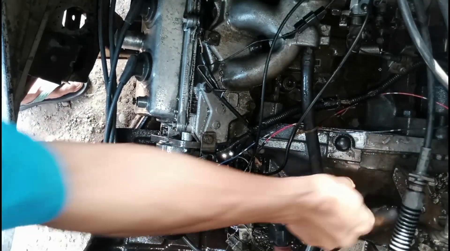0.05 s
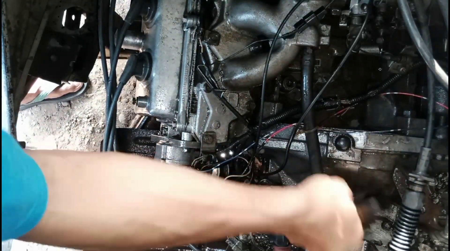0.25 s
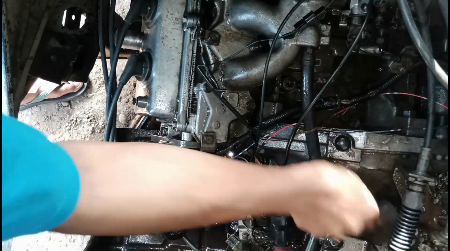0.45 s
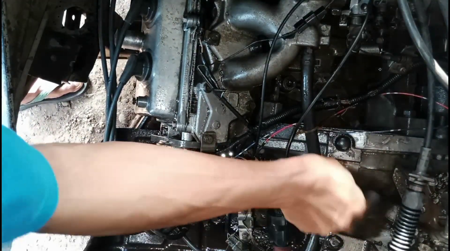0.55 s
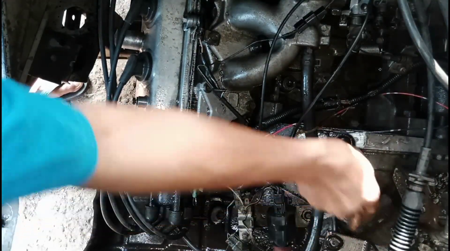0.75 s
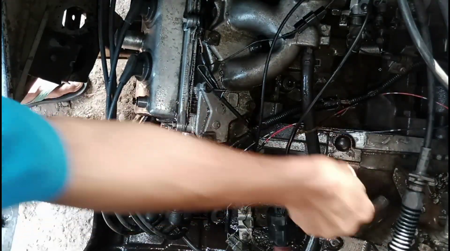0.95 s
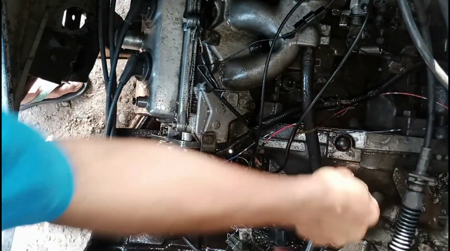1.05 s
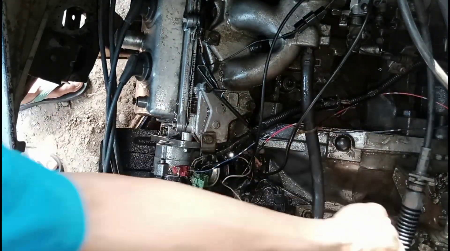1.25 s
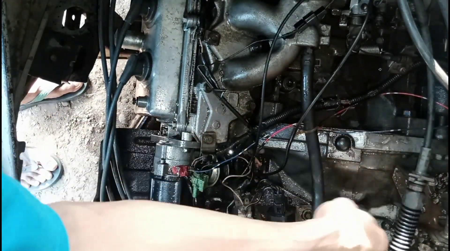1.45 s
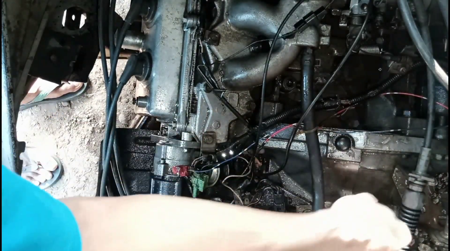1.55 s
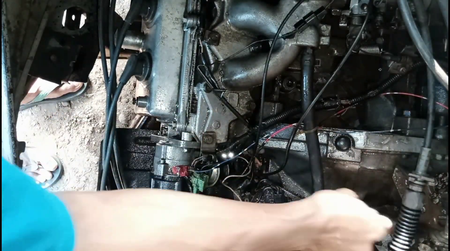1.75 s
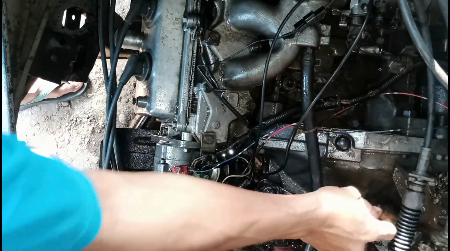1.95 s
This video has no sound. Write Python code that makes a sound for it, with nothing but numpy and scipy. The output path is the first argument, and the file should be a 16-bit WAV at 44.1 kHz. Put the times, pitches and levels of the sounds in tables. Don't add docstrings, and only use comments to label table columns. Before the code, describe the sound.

A paintbrush scrubs engine parts close to a phone microphone outdoors: short dry bristle hisses, wooden handle scraping and knocking on metal, loudest near the middle, over a faint wavering low machine hum.

```python
import sys
import numpy as np
from scipy import signal
from scipy.io import wavfile
from scipy.ndimage import uniform_filter1d

SR = 44100
rng = np.random.default_rng(int(sys.argv[2]) if len(sys.argv) > 2 else 0)


def volts_from_db(level):
    exponent = np.asarray(level, float) / 20
    return 10 ** exponent


def unload_audio(sound):
    columns = np.transpose(np.atleast_2d(sound))
    steps = np.round(np.clip(columns, -1, 1) * 32767)
    wavfile.write(sys.argv[1], SR, steps.astype(np.int16))


N = 88200


def evened(x):
    return x / np.sqrt(np.mean(x ** 2) + 1e-20)


def read(points, hz):
    f, value = np.transpose(points)
    return np.interp(np.log(hz + 1), np.log(f + 1), value)


def colour(x, gain_db):
    hz = abs(np.fft.fftfreq(4096, 1 / SR))
    log_gain = np.log(volts_from_db(gain_db(hz)))
    taps = np.fft.ifft(np.exp(signal.hilbert(log_gain).conj())).real[:2048]
    return signal.fftconvolve(x, taps)[:len(x)]


def resonate(x, hz, width_hz):
    r = np.exp(-np.pi * width_hz / SR)
    w = 2 * np.pi * hz / SR
    return signal.lfilter([0, np.sin(w)], [1, -2 * r * np.cos(w), r * r], x)


def ring_modes(drive, hz, db, t60):
    return sum(volts_from_db(g) * resonate(drive, f, 2.2 / d) for f, g, d in zip(hz, db, t60))


def add(mix, s, sound):
    at = round(s * SR)
    part = mix[max(at, 0):][:len(sound) + min(at, 0)]
    part += sound[max(-at, 0):][:len(part)]


def smooth_twice(x, size):
    return uniform_filter1d(uniform_filter1d(x, size=size), size=size)


def swell(rise, fall):
    edge_db = 25
    t = np.arange(-2 * rise, 2 * fall, 1 / SR)
    return volts_from_db(-edge_db * np.where(t < 0, (t / rise) ** 2, abs(t / fall) ** 1.104))


def clicks(count, per_s, spread_db):
    happens, sign, size = rng.random((count, 3)).T
    heights = np.sign(sign - 0.5) * volts_from_db(-spread_db * np.log(size + 0.00318))
    return evened((happens < per_s / SR) * heights)


def patchy(x, frames=18, bins=3):
    z = signal.stft(x, nperseg=256)[2]
    patches = uniform_filter1d(rng.standard_normal(z.shape), size=bins, axis=0)
    patches = evened(uniform_filter1d(patches, size=frames, axis=1))
    patch_db = 2.5
    return signal.istft(z * volts_from_db(patch_db * patches), nperseg=256)[1][:N]


# (frequency [Hz], level [dB], fade by 60 dB [s])
FERRULE_MODES = [(3300, -6, .015), (4200, -6, .015), (5900, -3, .015), (6250, 0, .025), (6700, -3, .015),
                 (8900, -4, .015)]


def ferrule(drive):
    return evened(ring_modes(drive, *np.transpose(FERRULE_MODES)))


# (fullest moment [s], rise [s], fall [s], level [dB], brightness [dB per octave]); the first four,
# faint and short, are the background hiss fluttering before the brush work
SWEEPS = [(.005, 0.045, 0.05, -48.5, 0), (0.065, 0.043, 0.039, -51.5, 2.5), (0.119, 0.032, 0.045, -41, 11),
          (0.181, 0.0097, 0.05, -49.5, 2), (0.225, .03, 0.11, -38, 1.5), (0.352, 0.041, 0.099, -37, 2.5),
          (0.402, 0.09, 0.084, -34.5, 5), (0.543, 0.029, 0.11, -40, 3.5), (1.971, 0.024, 0.039, -36, 6),
          (0.677, 0.12, 0.064, -36, 5), (1.085, 0.011, 0.061, -41, 13), (0.777, 0.1, 0.26, -38, 4),
          (0.982, 0.058, 0.092, -35, 3.5), (1.119, .04, 0.042, -36, 0), (1.229, 0.077, 0.11, -32.5, 7.5),
          (1.292, 0.036, 0.051, -41, 2.5), (1.37, 0.047, 0.062, -44.5, 3), (1.422, 0.025, 0.28, -52, -5.5),
          (1.494, 0.062, 0.03, -29.5, 6), (1.542, 0.054, 0.045, -28.5, 5), (1.64, 0.058, 0.073, -45, 4),
          (1.741, 0.048, 0.065, -34, 4.5), (1.849, 0.062, 0.075, -44, 0.5), (1.932, 0.03, 0.047, -43, -1)]
# (frequency [Hz], level [dB])
BRISTLE_COLOUR = [(400, -12), (1700, -13.5), (2300, -6.5), (4000, -3.5), (5200, -6), (6300, -1.5),
                  (7500, -8), (9000, -7)]


def bristles():
    out = np.zeros(N)
    flicks = clicks(N + SR, per_s=7200, spread_db=2)
    ferrule_db = -27
    for s, rise, fall, db, tilt_db in SWEEPS:
        shape = swell(rise, fall)
        under_sweep = flicks[round(s * SR):][:len(shape)]
        hiss = colour(under_sweep, lambda hz: read(BRISTLE_COLOUR, hz) + tilt_db * np.log2((hz + 300) / 6000))
        brush = evened(evened(hiss) + volts_from_db(ferrule_db) * ferrule(hiss))
        add(out, s - 2 * rise, volts_from_db(db) * shape * brush)
    return patchy(out)


# (time [s], length [s], level [dB])
HUM_SWELLS = [(0.072, 0.3, -55), (0.176, 0.042, -48), (0.337, 0.042, -54), (0.494, 0.072, -38.5),
              (0.602, 0.071, -40.5), (0.732, 0.16, -43.5), (0.902, .1, -57), (1.086, 0.047, -41),
              (1.188, 0.045, -45.5), (1.382, 0.23, -75.5), (1.488, 0.15, -44.5), (1.57, 0.072, -40),
              (1.643, 0.031, -38.5), (1.702, 0.078, -44.5), (1.829, 0.051, -44), (1.935, 0.05, -38)]
# (frequency [Hz], level [dB])
AIR_COLOUR = [(20, -24), (60, 13), (150, -16), (220, 6), (700, -0.5), (1100, -9.5), (2500, -12),
              (6000, -20.5)]


def hum():
    fuzz, upper, air, wander = rng.standard_normal((N, 4)).T
    t = np.arange(N) / SR
    middle_hz, wander_hz = 103, 6.25
    fuzz_db, upper_db, air_db = -51.5, -61, -67

    hz = middle_hz + wander_hz * evened(smooth_twice(wander, 2500))
    level = sum(volts_from_db(db) * np.exp(-2 * ((t - s) / length * 2) ** 2) for s, length, db in HUM_SWELLS)
    low = level * np.sqrt(2) * np.sin(2 * np.pi * np.cumsum(hz) / SR)
    low += volts_from_db(fuzz_db) * evened(resonate(resonate(fuzz, 121.5, 40), 82, 58.3))

    upper = evened(resonate(resonate(upper, 180, 25), 180, 59))
    upper = volts_from_db(upper_db) * upper * evened(level + 0.0047)

    air = patchy(colour(air, lambda f: read(AIR_COLOUR, f)), frames=24, bins=2)
    return low + upper + volts_from_db(air_db) * evened(air)


# (frequency [Hz], level [dB], fade by 60 dB [s])
HANDLE_MODES = [(303.5, -10.5, 0.06), (444, -10, 0.075), (530, 5.5, 0.029), (784, 0.5, 0.028),
                (1010, -0.5, 0.021), (1223, -0.5, 0.012), (1500, 6, 0.017), (1789, -4, 0.021),
                (2050, -10.5, 0.024), (2297, -4, 0.025), (2510, 1.5, 0.01), (2674, -14, 0.06),
                (3030, -10.5, 0.026), (3150, -3.5, 0.036)]


def handle(drive, spot_hz, octaves, chance):
    hz, db, t60 = np.transpose(HANDLE_MODES)
    floor_db, uneven_db = -13.5, 3
    spot_db = np.maximum(-6 * (np.log2(hz / spot_hz) / octaves) ** 2, floor_db)
    ring = ring_modes(drive, hz, db + spot_db + uneven_db * chance, t60)
    return signal.lfilter(*signal.butter(3, 0.5 * spot_hz, "high", fs=SR), ring)


# (fullest moment [s], rise [s], fall [s], level [dB], centre of the spot [Hz])
DRAGS = [(0.229, 0.024, 0.081, -33, 1030), (0.343, 0.027, 0.043, -38, 1180),
         (0.414, 0.095, 0.042, -43.5, 850), (0.546, 0.026, 0.041, -39, 850),
         (0.629, 0.025, 0.053, -37.5, 1110), (0.68, 0.037, 0.068, -35.5, 1131),
         (0.747, 0.037, 0.12, -50.5, 830), (0.793, 0.072, 0.065, -35, 1030),
         (0.984, 0.024, 0.053, -31.5, 2270), (1.117, 0.026, 0.066, -34.5, 810),
         (1.182, 0.028, 0.041, -53.5, 1330), (1.249, 0.021, 0.052, -43, 1040),
         (1.415, .02, 0.076, -37.5, 695), (1.511, 0.017, 0.051, -36, 1400),
         (1.745, 0.0069, 0.072, -31.5, 503), (0.547, 0.024, 0.041, -40, 270),
         (1.842, 0.06, 0.055, -49, 780), (1.085, 0.008, 0.11, -42.5, 970),
         (1.972, 0.026, 0.029, -49.5, 540)]


def drags():
    out = np.zeros(N)
    slips = clicks(N + SR, per_s=2200, spread_db=3)
    octaves = 0.86
    for s, rise, fall, db, spot_hz in DRAGS:
        shape = swell(rise, fall)
        chance = rng.uniform(0.078, 1, len(HANDLE_MODES))
        drive = slips[round(s * SR):][:len(shape)]
        steady = handle(drive, spot_hz, octaves, chance).std()
        add(out, s - 2 * rise, volts_from_db(db) * handle(drive * shape, spot_hz, octaves, chance) / steady)
    return out


# (time [s], peak [dB], centre of the struck spot [Hz],
#                 crack against the peak [dB], spread of the spot [octaves])
KNOCKS = [(0.21, -27.5, 1530, -9.5, 0.31), (0.2172, -21.5, 2180, -19, 0.55), (.223, -23, 1230, -16, 0.26),
          (0.234, -28, 720, -2, 0.64), (0.3745, -18.5, 1150, -38, 0.71), (0.405, -21.5, 1400, -18, 0.88),
          (.527, -27, 2850, -9.5, 0.15), (.549, -25.5, 2940, -7, 0.13), (0.614, -15.5, 1336, -15.5, 0.28),
          (.644, -9, 1350, -22, 0.44), (0.6669, -3.5, 1350, -16, 0.33), (.729, -20, 1150, -31, 0.38),
          (1.737, -31.5, 396, -31.5, 0.74), (.956, -3, 1778, -20.5, 0.31), (0.9783, -20.5, 2115, -9.5, 1.1),
          (.985, -19, 2020, -6, 0.18), (0.989, -20, 2600, -10, 0.44), (1.01, -21.5, 1830, -34, 1.1),
          (1.081, -37.5, 780, -5, 0.41), (1.2361, -14.5, 1480, -12, 0.71), (1.402, -15, 1660, -10.5, 0.44),
          (1.433, -26, 2500, -1.5, 1.1), (1.4957, -13.5, 1400, -9, 0.35), (1.735, -18.5, 1100, -0.5, 1.3)]


def knocks():
    out, t = np.zeros(N), np.arange(5000) / SR
    contact_s = 0.0011
    rattle_db, rattle_t60, crack_t60 = -11, 0.06, 0.1
    ferrule_db, blow_edge = -19.5, 1.72
    for s, peak_db, spot_hz, crack_db, octaves in KNOCKS:
        drive = volts_from_db(rattle_db - 60 * t / rattle_t60) * clicks(len(t), 2500, 2.0) * 0.1
        drive[:12] -= np.hanning(14)[1:-1] / 6.5
        ring = handle(drive, spot_hz, octaves, rng.uniform(-0.43, 0.76, len(HANDLE_MODES)))
        ring = signal.lfilter(*signal.butter(3, blow_edge * spot_hz * 2 ** octaves, fs=SR), ring)

        burst = rng.standard_normal(len(t)) * (volts_from_db(-60 * t / 0.016) + volts_from_db(-7 - 60 * t / crack_t60))
        crack = colour(burst, lambda hz: 0.9 * read(BRISTLE_COLOUR, hz) - 0.3 * np.maximum(hz - 8000, 0) / 1000)
        crack = evened(crack) + volts_from_db(ferrule_db) * ferrule(burst)
        knock = ring / abs(ring).max() + volts_from_db(crack_db + 9.5) * crack / abs(crack).max()
        add(out, s + contact_s, volts_from_db(peak_db) * knock)
    return out


# (time [s], level [dB], pitch [Hz], fade by 60 dB [s])
RINGS = [(1.405, -25.5, 1016, 0.039), (0.212, -28.5, 1500, 0.018), (.2185, -29, 2370, 0.02),
         (0.226, -28, 1180, 0.014), (.254, -26, 1500, 0.021), (.335, -42, 1500, 0.028),
         (.3755, -26, 1010, 0.038), (.4055, -30, 2430, 0.025), (.528, -27.5, 2740, 0.027),
         (.528, -30.5, 1350, 0.031), (.529, -32, 518, 0.035), (.55, -26.5, 2940, 0.037),
         (.55, -36, 4400, 0.017), (0.6149, -32, 1515, 0.053), (.6155, -35, 770, 0.031),
         (0.624, -29, 995, 0.051), (.645, -18.5, 1010, 0.049), (0.67, -25.5, 5800, 0.03),
         (0.668, -28, 3290, 0.041), (0.675, -19.5, 1010, 0.027), (0.7485, -27, 1200, .02),
         (0.7735, -36, 1600, 0.018), (.776, -33, 3280, 0.013), (.786, -25.5, 3330, 0.0092),
         (.786, -32, 1510, .03), (.786, -32, 6030, 0.026), (.96, -11.5, 1430, 0.0096),
         (0.9791, -35, 6600, 0.0072), (.986, -21.5, 8490, 0.018), (0.991, -23.5, 2840, 0.011),
         (1.0004, -27, 1500, .03), (1.011, -35, 2260, 0.013), (1.0828, -31, 6830, 0.011),
         (1.103, -30, 1180, 0.037), (0.956, -20.5, 3990, 0.014), (.98, -20, 2490, 0.011),
         (.805, -36.5, 530, 0.052), (1.237, -21.5, 2386, 0.01), (1.236, -25.5, 6700, 0.014),
         (1.2405, -27, 855, 0.03), (1.405, -26.5, 3510, 0.019), (1.496, -7.5, 1240, 0.016),
         (1.496, -15.5, 2380, 0.013), (1.7367, -23, 1280, 0.028), (1.7368, -22, 3040, 0.015),
         (1.743, -27.5, 610, 0.018), (1.74, -29, 302, 0.076), (1.9157, -36.5, 3870, 0.012),
         (1.926, -44.5, 1406, 0.077), (1.967, -49, 750, 0.021), (1.982, -44, 460, 0.024)]


def rings():
    out, t = np.zeros(N), np.arange(6000) / SR
    rise_cycles, chatter_share = 1.16, 0.8
    for s, db, hz, t60 in RINGS:
        rise = np.sin(np.pi / 2 * np.minimum(t * hz / rise_cycles, 1)) ** 2
        width_hz = 0.2 * hz
        noise = rng.standard_normal(len(t))
        chatter = evened(resonate(resonate(noise, hz, width_hz), hz, width_hz))
        chatter *= chatter_share * np.minimum(t / 0.006, 1)
        add(out, s, volts_from_db(db - 60 * t / t60) * rise * (np.sin(2 * np.pi * hz * t) + chatter))
    return out


def scene():
    return (bristles() + hum() + drags() + knocks() + rings())[None]


def band_limit(x):
    return signal.sosfilt(signal.butter(12, 16830, fs=SR, output="sos"), x)


# (frequency [Hz], gain [dB])
HEARD_COLOUR = [(9000, -1.5), (11000, -11), (13200, -22), (14000, -22), (15000, -4), (15550, -27),
                (15750, -51), (16800, -49.5)]


def record(dry):
    heard = colour(dry[0], lambda hz: read(HEARD_COLOUR, hz) - 90 * (hz > 16850))
    low_cut = signal.butter(2, 73, "high", fs=SR, output="sos")
    heard = signal.sosfilt(low_cut, heard)
    return band_limit(heard[None])


dry = scene()
out = record(dry)
unload_audio(out)
```